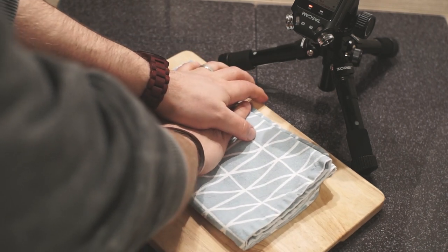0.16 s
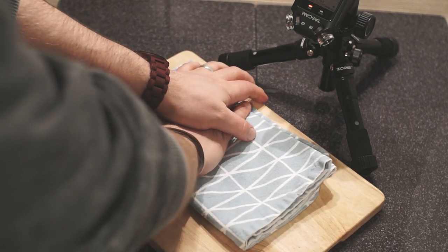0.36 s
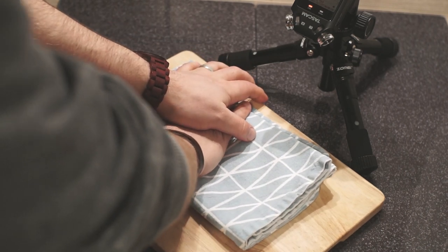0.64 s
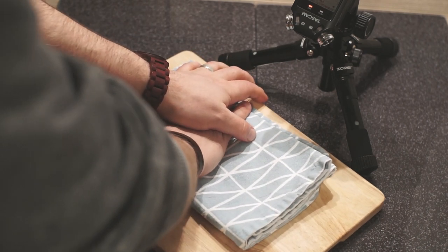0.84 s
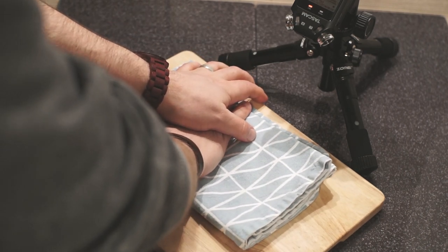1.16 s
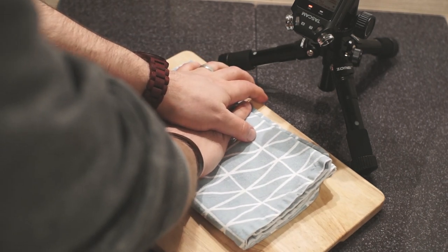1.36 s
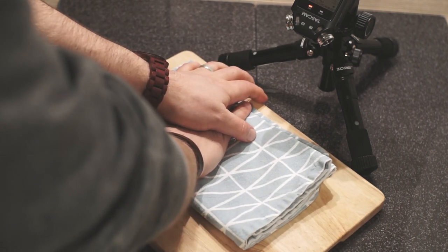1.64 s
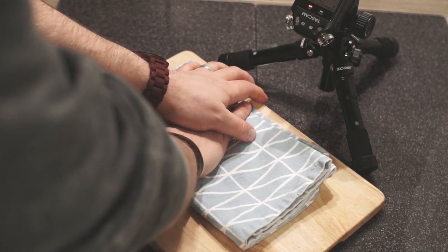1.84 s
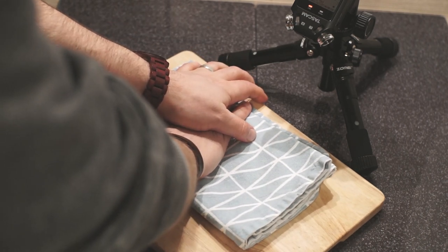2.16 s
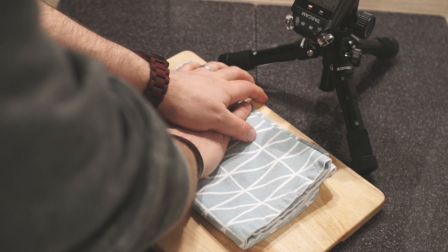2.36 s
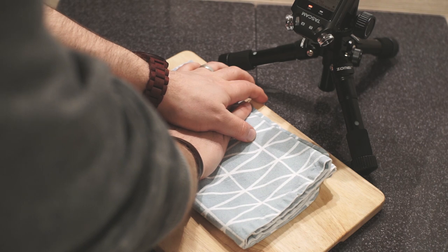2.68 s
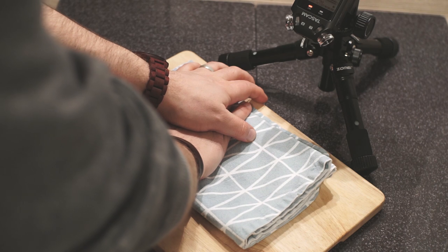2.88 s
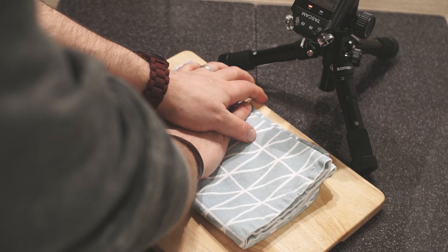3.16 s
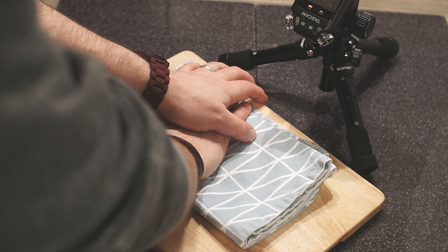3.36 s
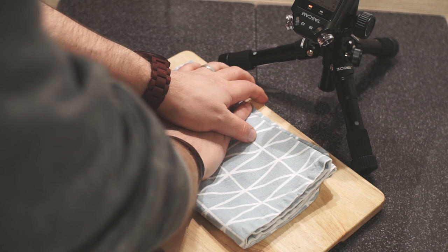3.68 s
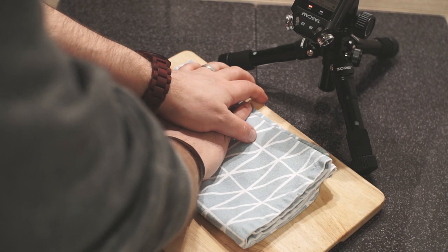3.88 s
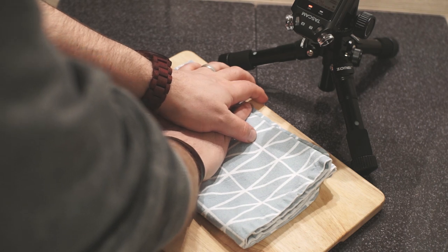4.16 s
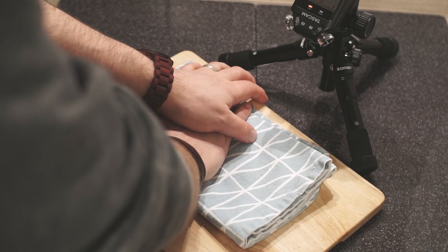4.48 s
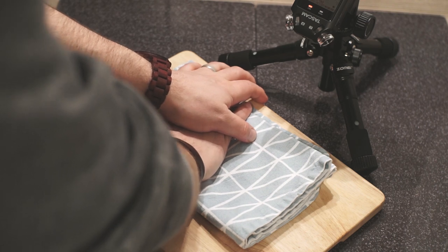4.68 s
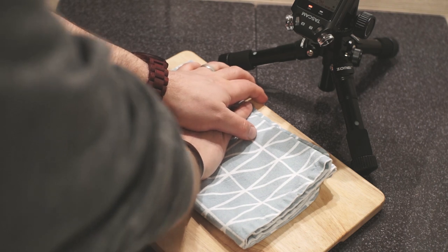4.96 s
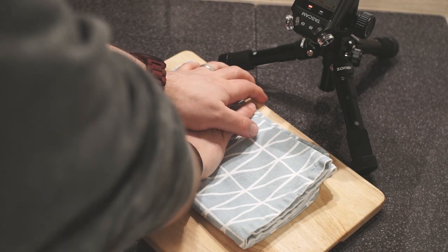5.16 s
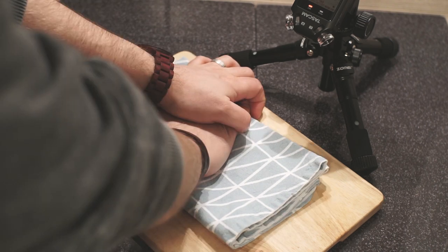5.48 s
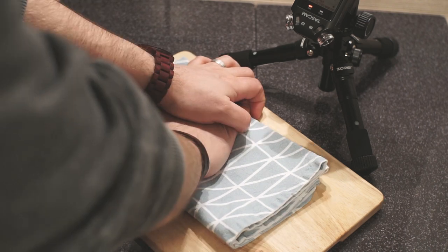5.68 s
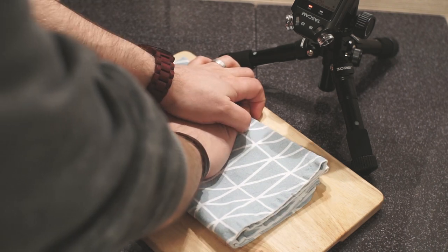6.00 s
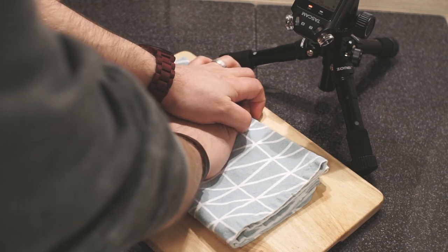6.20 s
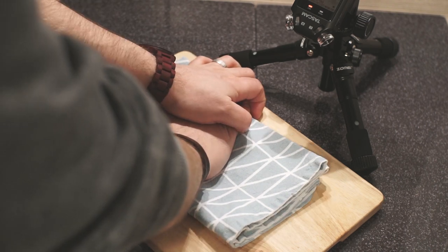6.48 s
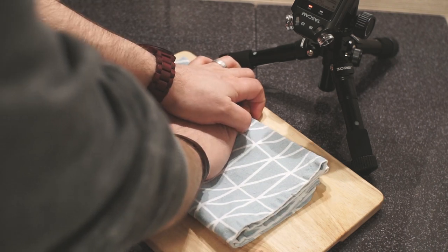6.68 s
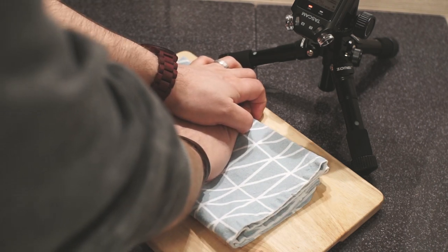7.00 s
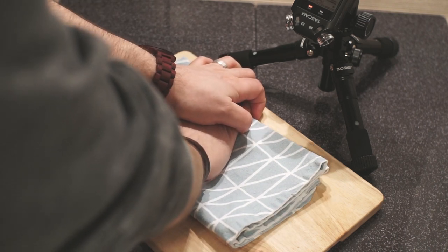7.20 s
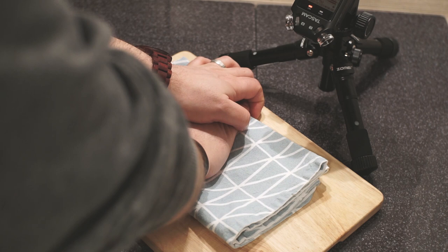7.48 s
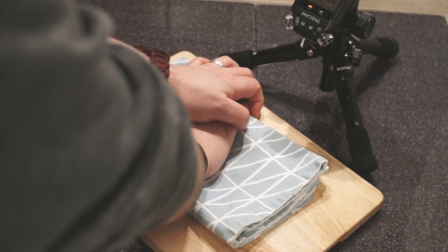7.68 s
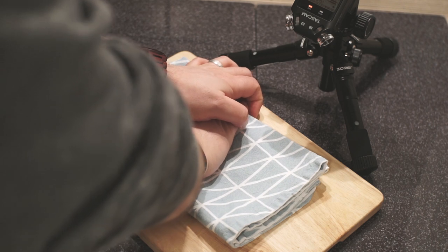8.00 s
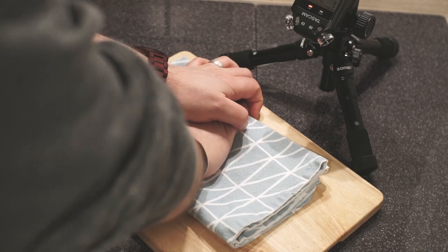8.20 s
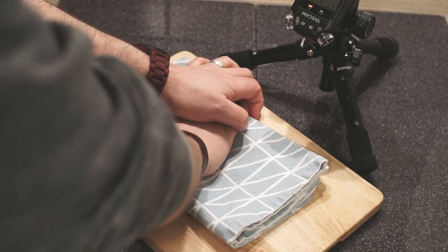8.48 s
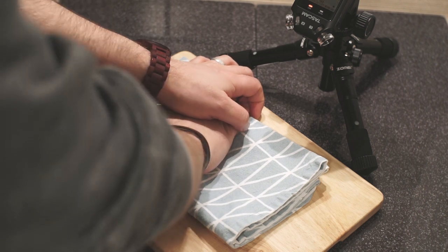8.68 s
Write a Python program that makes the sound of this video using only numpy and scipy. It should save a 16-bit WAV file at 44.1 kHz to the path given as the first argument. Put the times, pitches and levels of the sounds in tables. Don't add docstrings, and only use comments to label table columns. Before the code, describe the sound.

Quiet cloth rustle, then a quick pair of brittle cracks, a heavier woody snap and another bright snap, spaced by near silence. The wooden board creaks softly, towel fibres scuff, and then the hardest breaks come in a rapid run with knocks and thumps. Afterwards only crumbs and busy cloth movement. Close miking, short small-room echo, low rumble and steady faint hiss.

```python
import sys
import numpy as np
from scipy import signal
from scipy.fft import rfft, irfft
from scipy.io import wavfile
from scipy.ndimage import uniform_filter1d

SR = 44100
rng = np.random.default_rng(int(sys.argv[2]) if len(sys.argv) > 2 else 0)


def elevation(decibels):
    levels = np.asarray(decibels, float)
    return 10 ** (levels / 20)


def log_audio(samples):
    frames = np.atleast_2d(samples).T
    limited = np.clip(frames, -1, 1)
    pcm = np.round(limited * 32767).astype(np.int16)
    wavfile.write(sys.argv[1], SR, pcm)


N = 390285

# start in seconds, crack peak in dB, then floor thump, board knock and
# shards, each in dB relative to the crack.
BREAKS = [(0.903, -13.5, -27, -22.5, -14.5), (0.9508, -22, -26.5, -16, -8),
          (0.9719, -11.5, -6.5, -9.5, -14), (2.5162, -30.5, -30, -30.5, -5), (2.608, -9.5, 2.5, 0, -12.5),
          (3.5148, -40, -30, -49.5, -2), (3.7063, -6.5, -36.5, -25.5, -25), (3.7199, -18.5, -4, -6, -13),
          (6.192, -40.5, -28, -29.5, -0.5), (6.4759, -5, -11.5, -9, -15.5), (6.633, -26.5, -20.5, -14, -9),
          (7.0402, 0, -16, -15, -19.5), (7.0600, -6, -17, -8, -16), (7.0673, -6.5, -10, -6, -14),
          (7.228, -27.5, -20, -41, -10.5), (7.3459, -39, -18, -14.5, -4), (7.5426, -13, -28.5, -20, -13),
          (7.6311, -12.5, -12.5, -6, -11), (7.723, -8.5, -4.5, -1.5, -10)]


def time(seconds):
    return np.arange(int(seconds * SR)) / SR


def unit(x):
    return x / np.sqrt(np.mean(x ** 2))


def fade(t, t60_s):
    return np.exp(-np.log(1000) * t / max(t60_s, 1e-3))


def ramp(at_s, rise_s):
    return np.clip((np.arange(N) / SR - at_s) / rise_s + 0.5, 0, 1)


def band(x, lo_hz, hi_hz):
    edges_hz = [lo_hz, min(hi_hz, 0.45 * SR)]
    return signal.sosfilt(signal.butter(2, edges_hz, "bandpass", fs=SR, output="sos"), x)


def ring(modes, seconds):
    t = time(seconds)
    y = sum(elevation(db) * fade(t, t60_s) * np.sin(2 * np.pi * hz * t) for hz, db, t60_s in modes)
    return y / np.abs(y).max()


def coloured(points):
    hz, db = np.transpose(points)
    f = np.arange(N // 2 + 1) * SR / N + 1e-3
    gain = elevation(np.interp(np.log(f), np.log(hz), db))
    return unit(irfft(rfft(rng.standard_normal(N)) * gain, N))


def walk(rate_hz):
    k = int(SR / rate_hz)
    held = rng.standard_normal(1000)[np.arange(N) // k]
    return uniform_filter1d(uniform_filter1d(held, k), k)


def add(track, s, sound):
    i = int(round(s * SR))
    track[i:i + len(sound)] += sound[:N - i]


def hand_shift_db():
    # time in seconds, movement in dB above rest.
    shift_points = [(0, -10.5), (.29, 9.5), (.67, -2), (1.3, 3), (2.05, -5.5), (2.3, 0.5), (2.95, 6),
                    (3.55, -4.5), (4.05, 3.5), (4.83, -4), (5.15, 4.5), (5.4, 1), (5.6, 12.5), (6.3, 10.5),
                    (6.8, 5.5), (7.02, 14.5), (8.4, 7), (8.65, 19.5)]
    return np.interp(np.arange(N) / SR, *np.transpose(shift_points))


def rumble(shift_db):
    # frequency in Hz, density in dB per Hz.
    rumble_spectrum = [(20, -2.5), (31, -4), (45, 2), (62, -5), (120, -15), (155, -28.5), (220, -29),
                       (300, -59.5)]
    rest_db, per_shift_db = -58, 0.067
    lean_s, lean_rise_s, lean_db = 4.95, 0.11, 4.5
    shake_db, shake_t60_s = -20, 0.71
    t = np.arange(N) / SR
    load = elevation(rest_db + per_shift_db * shift_db + lean_db * ramp(lean_s, lean_rise_s))
    for s, db, thump_db, _, _ in BREAKS:
        load += elevation(db + thump_db + shake_db) * (t > s) * fade(np.maximum(t - s, 0), shake_t60_s)
    return load * elevation(2.2 * walk(3)) * coloured(rumble_spectrum)


def groan(shift_db):
    # centre in Hz, width in Hz, level in dB.
    groan_bands = [(245, 30, -1.5), (400, 360, -3.5), (520, 80, -10.5)]
    rest_db, per_shift_db = -82, 0.65
    y = np.zeros(N)
    for hz, width_hz, db in groan_bands:
        noise = unit(band(rng.standard_normal(N), hz - width_hz / 2, hz + width_hz / 2))
        y += elevation(db + 2 * walk(10)) * noise
    return elevation(rest_db + per_shift_db * shift_db) * unit(y)


def cloth(shift_db):
    rustle_db = -90
    grains = rng.standard_normal(N) * elevation(5.5 * walk(80))
    y = unit(band(grains, 680, 1300)) + elevation(-3) * unit(band(grains, 1900, 3000))
    return elevation(rustle_db + shift_db) * unit(y)


def hiss():
    # frequency in Hz, density in dB per Hz.
    hiss_spectrum = [(200, -16.5), (400, -0.5), (800, -6.5), (1500, -4), (3000, -7.5), (8000, -7.5),
                     (16000, -10.5), (18000, -32.5)]
    hiss_db, nudge_s, nudge_rise_s, nudge_db = -80.5, 5.52, 0.12, 3.5
    return elevation(hiss_db + nudge_db * ramp(nudge_s, nudge_rise_s)) * coloured(hiss_spectrum)


def ticks():
    # start in seconds, peak in dB, centre in Hz.
    cloth_scuffs = [(0.239, -68.5, 1120), (0.279, -59, 1200), (0.329, -63.5, 1670), (0.444, -61, 2450),
                    (0.569, -64, 1090), (0.59, -60.5, 1960), (0.81, -65, 2000), (2.299, -64, 930),
                    (4.968, -63, 1010), (5.602, -58.5, 1260), (5.678, -60.5, 1770), (5.788, -60, 2520),
                    (5.839, -62.5, 1153), (5.897, -57.5, 2020), (6.095, -52, 1190), (6.119, -56, 1460),
                    (6.158, -56, 1780), (6.964, -58.5, 1980), (6.988, -54.5, 2430), (7.017, -58, 1200),
                    (8.259, -67, 803), (8.289, -63, 2300), (8.449, -59.5, 2194), (8.544, -52.5, 2200),
                    (8.587, -56, 1100), (8.671, -51.5, 2040), (8.694, -53.5, 1480), (8.735, -56.5, 2324),
                    (8.769, -55.5, 2295), (8.823, -58.5, 2230)]
    # start in seconds, scuff peak in dB, scuff centre in Hz, bright crack peak in dB.
    crumbs = [(3.468, -64.5, 1190, -59), (4.769, -75, 1115, -65), (5.039, -64.5, 1630, -63),
              (5.51, -62, 1270, -72), (6.785, -59.5, 804, -57.5), (7.968, -62.5, 2038, -60),
              (8.118, -60.5, 1200, -65)]
    attack_s, crack_t60_s = 0.0015, 0.045
    out, t = np.zeros(N), time(0.05)
    for s, db, hz in cloth_scuffs + [row[:3] for row in crumbs]:
        decay = fade(t, 0.018) + 0.35 * fade(t, 0.09)
        rub = rng.standard_normal(len(t)) * decay * np.minimum(t / attack_s, 1)
        scuff = band(rub, hz / 1.25, hz * 1.25)
        broad = scuff
        for _ in range(3):
            broad = band(broad, 350, 3900)
        scuff = scuff + elevation(-2) * broad
        add(out, s, elevation(db) * scuff / np.abs(scuff).max())
    for s, _, _, db in crumbs:
        crack = band(rng.standard_normal(len(t)) * fade(t, crack_t60_s), 2500, 13000)
        add(out, s, elevation(db) * crack / np.abs(crack).max())
    return out


def room(x):
    # band centre in Hz, level in dB, t60 in seconds.
    room_bands = [(324.1, -36, 0.23), (754, -44.5, 0.44), (1200, -44, 0.4), (1900, -42, 0.3),
                  (3600, -42.5, 0.3), (6360, -41, 0.15), (9600, -39, .2), (13000, -38.5, 0.12)]
    build_s = 0.002
    t = time(0.6)
    tail = np.zeros(len(t))
    for hz, db, t60_s in room_bands:
        echoes = unit(band(rng.standard_normal(len(t)), hz / 1.7, hz * 1.3))
        tail += elevation(db) * fade(t, t60_s) * echoes
    return signal.oaconvolve(x, (1 - np.exp(-t / build_s)) * tail)[:N]


def bumps():
    # start in seconds, level in dB, centre in Hz, t60 in seconds.
    board_bumps = [(0.29, -50, 303, 0.036), (1.581, -66, 400, 0.13), (2.082, -65.5, 284, 0.1),
                   (2.30, -66, 438, 0.089), (3.091, -58, 385, 0.11), (3.117, -56.5, 245, 0.55),
                   (4.221, -75, 500, .1), (4.699, -66, 430, 0.15), (4.963, -60.5, 453, 0.21),
                   (6.786, -45.5, 224, 0.11), (6.785, -45, 690, 0.043), (6.789, -37.5, 67.7, 0.25),
                   (3.122, -43.5, 57.6, 0.94), (8.46, -64.5, 520, 0.29)]
    attack_s = 0.014
    out, t = np.zeros(N), time(0.5)
    for s, db, hz, t60_s in board_bumps:
        noise = unit(band(rng.standard_normal(len(t)), hz / 1.13, hz * 1.13))
        add(out, s, elevation(db) * noise * fade(t, t60_s) * np.minimum(t / attack_s, 1))
    return out


def fracture(lo_hz, hi_hz, rattle_t60_s, rattle_db, count=80):
    whip_s, pull_s = 0.0003, 0.00015
    tear_s, tear_db = 0.002, -13.5
    piece_t60_s, piece_db = 0.012, -15.5
    t = time(0.04)
    pitch, late, size = rng.random((count, 3)).T[:, :, None]
    hz = lo_hz * (hi_hz / lo_hz) ** pitch
    start = 0.5 * rattle_t60_s * late
    since = np.maximum(t - start, 0)
    splinters = elevation(-10 * size) * fade(start, rattle_t60_s)
    splinters = splinters * np.exp(-since * hz / 2) * np.sin(2 * np.pi * hz * since)
    whip = signal.unit_impulse(len(t), int(whip_s * SR)) - 0.1 * np.exp(-(t / pull_s - 1) ** 2)
    click = band(whip, lo_hz, hi_hz)
    peak = np.abs(click).max()
    after = np.maximum(t - whip_s, 0)
    steps = rng.standard_normal(len(t)) * (after > 0) * np.exp(-after / tear_s)
    tear = elevation(tear_db) * band(steps, lo_hz, hi_hz)
    pieces = elevation(piece_db - 6 * size[:5]) * fade(after, piece_t60_s) * np.sin(2 * np.pi * hz[:5] * after)
    return click / peak, tear / peak + pieces.sum(axis=0), elevation(rattle_db) * splinters.sum(axis=0)


def lift_high(x):
    hz, db = 12300, -6
    return x + elevation(db) * band(x, hz / 1.08, hz * 1.08)


def breaks():
    # low edge in Hz, high edge in Hz.
    shard_bands = [(900, 4400), (3700, 8400), (7600, 13500)]
    # frequency in Hz, level in dB, t60 in seconds.
    board_modes = [(543, -17, 0.013), (690, -1, 0.16), (732, 10, 0.063), (972, -10.5, 0.03),
                   (1190, -6, 0.0083), (1217, 2.5, 0.075), (1990, -16.5, .02)]
    # frequency in Hz, level in dB, t60 in seconds.
    floor_modes = [(45.7, -1, .45), (78.7, 5, 0.099), (109, -7, 0.3), (136, -11, 0.39), (237.4, -2.5, 0.13),
                   (255.8, -20, 0.61), (360, -17.5, 0.092)]
    signs = (1, -1, 1)
    rattle_t60_s, rattle_db = (0.04, 0.045, 0.045), (-9, -7, -7)
    knock_delay_s, drop_delay_s, push_s = 0.00019, 0.0024, 0.0039
    click, tear, spray, knock, blow, thump = np.zeros((6, N))
    push = np.hanning(int(push_s * SR))
    for s, db, thump_db, knock_db, shard_db in BREAKS:
        band_db = (db - 6.5, db + shard_db + 4.5, db + shard_db + 6.5)
        for sign, edges_hz, level_db, t60_s, spray_db in zip(signs, shard_bands, band_db, rattle_t60_s, rattle_db):
            snap, rip, splinters = fracture(*edges_hz, t60_s, spray_db)
            add(click, s, sign * elevation(level_db) * snap)
            add(tear, s, elevation(level_db) * rip)
            add(spray, s, elevation(level_db) * splinters)
        spot = []
        for hz, mode_db, t60_s in board_modes:
            spot_hz = hz * (1 + 0.011 * rng.standard_normal())
            spot.append((spot_hz, mode_db + 3 * rng.standard_normal(), t60_s))
        add(knock, s + knock_delay_s, elevation(db + knock_db + 4) * ring(spot, 0.1))
        add(blow, s, elevation(db + knock_db + 18) * np.ones(1))
        add(thump, s + drop_delay_s, elevation(db + thump_db + 5.5) * push / push.sum())
    slap = band(blow, 270, 1300)
    thump = -signal.oaconvolve(thump, ring(floor_modes, 0.8))[:N]
    return lift_high(click), lift_high(tear), lift_high(spray), knock, slap, thump


def creak():
    # start in seconds, length in seconds, start in Hz, sag in Hz per second, rms in dB.
    creak_tones = [
        (5.19, .09, 524, 100, -70),
        (5.3, .17, 521, 40, -78),
        (5.09, .22, 733, 130, -83),
        (5.36, .15, 696, 90, -83),
    ]
    edge_s = 0.04
    t, out = np.arange(N) / SR, np.zeros(N)
    for s, length_s, start_hz, sag, db in creak_tones:
        gate = ramp(s, edge_s) * (1 - ramp(s + length_s, 2 * edge_s))
        hz = (start_hz - sag * np.clip(t - s, 0, length_s)) * (1 + 0.0053 * walk(30))
        tone = np.sqrt(2) * np.sin(2 * np.pi * np.cumsum(hz) / SR)
        out += gate ** 2 * elevation(db + 3.4 * walk(15)) * tone
    return out


def scene():
    shift_db = hand_shift_db()
    bed = rumble(shift_db) + groan(shift_db) + cloth(shift_db) + hiss() + bumps() + creak()
    small = ticks()
    click, tear, spray, knock, slap, thump = breaks()
    walls = room(click + elevation(-9.5) * tear + elevation(-8) * small + slap + elevation(-17.5) * spray)
    close = elevation(-8.5) * click + tear + spray + knock + small
    return (close + walls + thump + bed)[None]


def top_cut(x):
    return signal.sosfilt(signal.butter(12, 17000, fs=SR, output="sos"), x)


def record(dry):
    mix = signal.sosfilt(signal.butter(12, 15750, fs=SR, output="sos"), dry)
    mix = signal.sosfilt(signal.butter(2, 36, "highpass", fs=SR, output="sos"), mix)
    return top_cut(mix)


dry = scene()
out = record(dry)
log_audio(out)
```